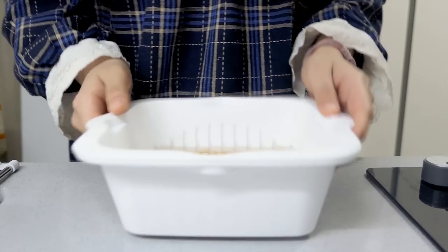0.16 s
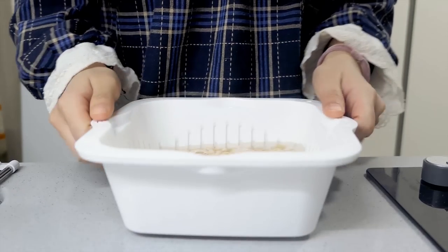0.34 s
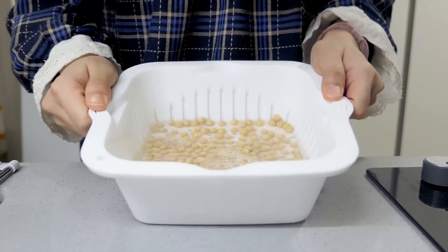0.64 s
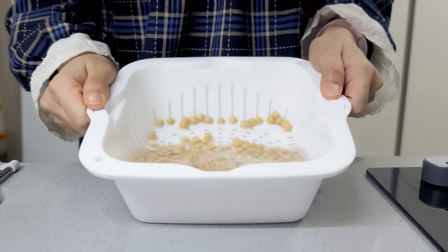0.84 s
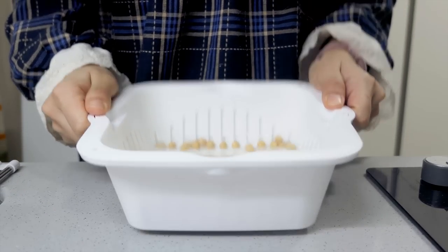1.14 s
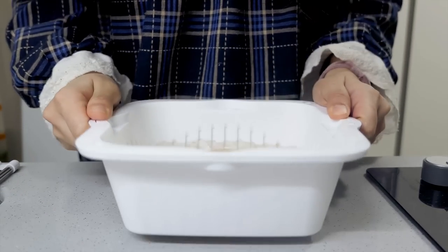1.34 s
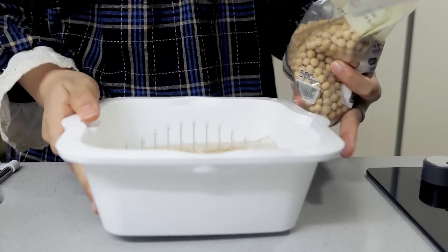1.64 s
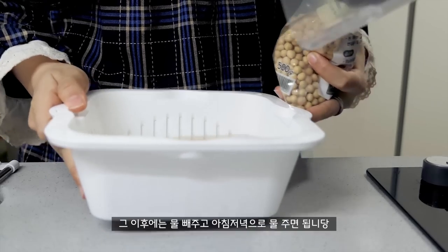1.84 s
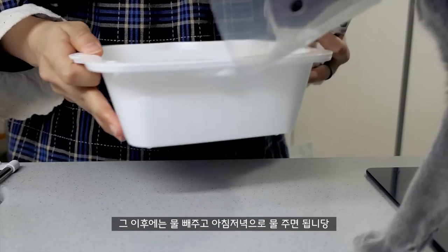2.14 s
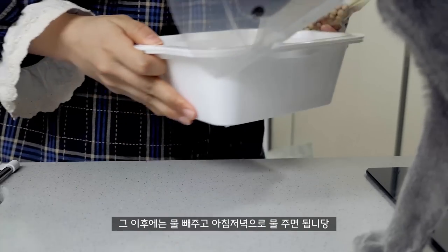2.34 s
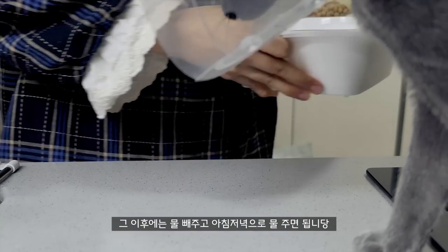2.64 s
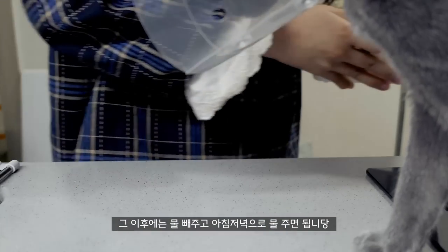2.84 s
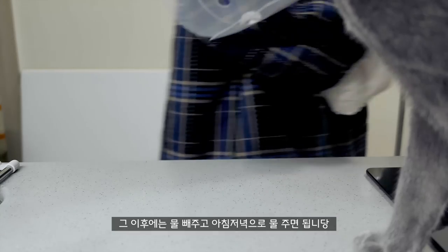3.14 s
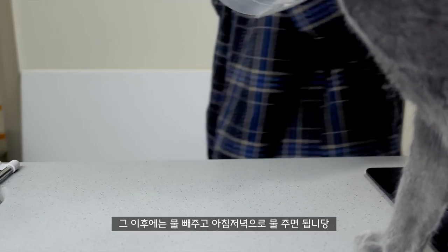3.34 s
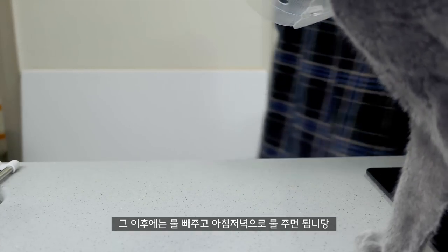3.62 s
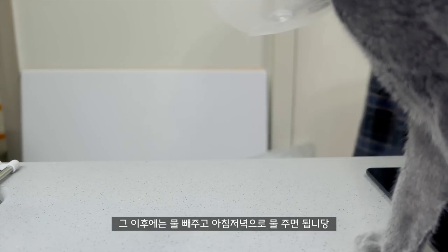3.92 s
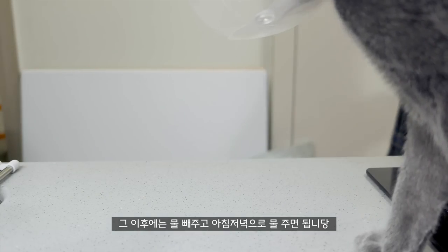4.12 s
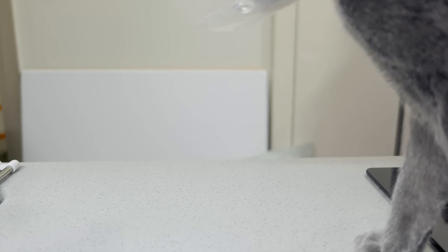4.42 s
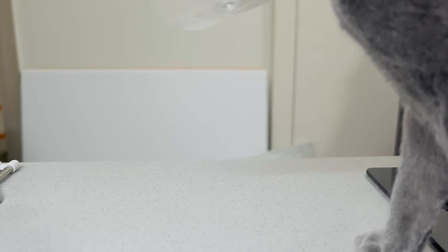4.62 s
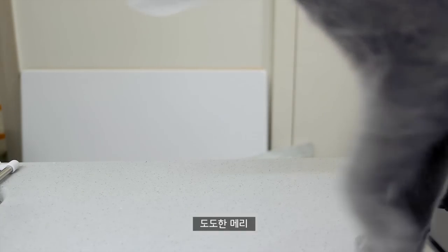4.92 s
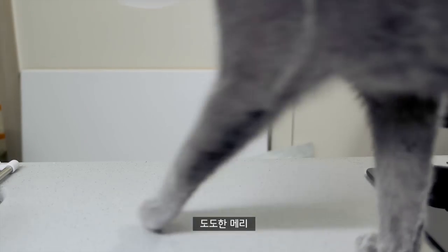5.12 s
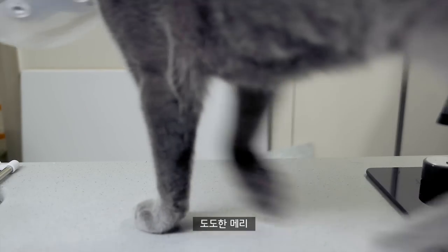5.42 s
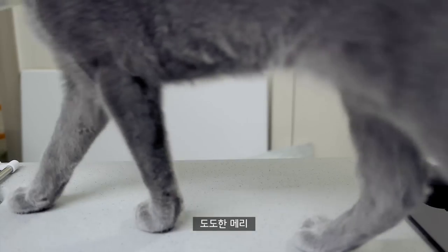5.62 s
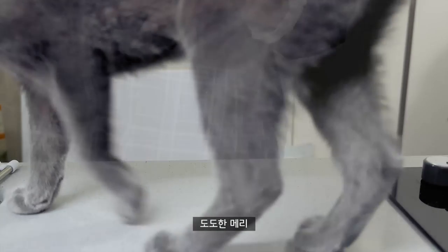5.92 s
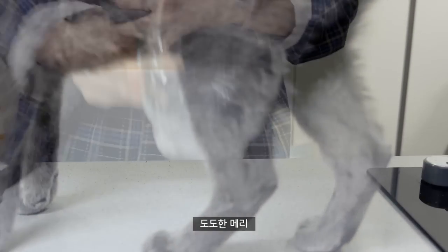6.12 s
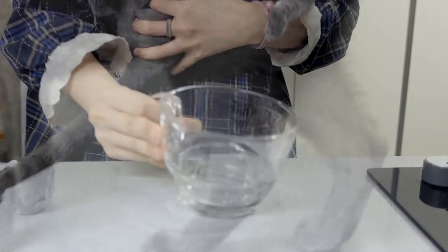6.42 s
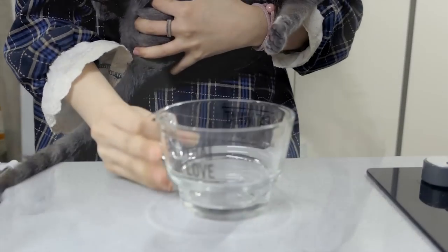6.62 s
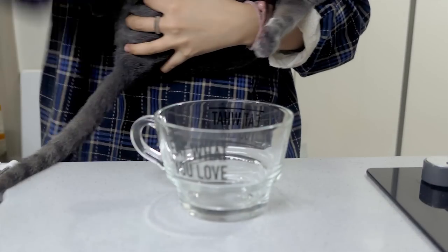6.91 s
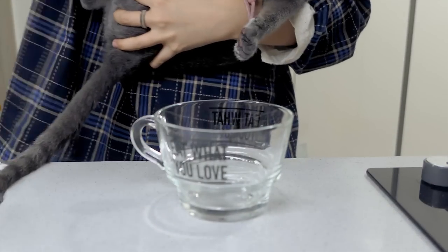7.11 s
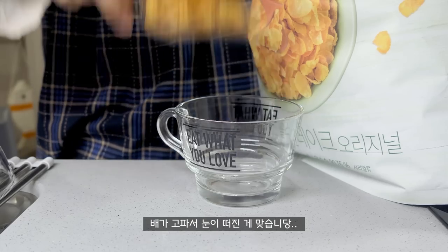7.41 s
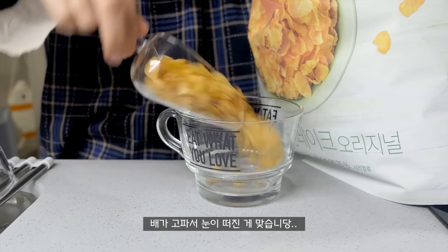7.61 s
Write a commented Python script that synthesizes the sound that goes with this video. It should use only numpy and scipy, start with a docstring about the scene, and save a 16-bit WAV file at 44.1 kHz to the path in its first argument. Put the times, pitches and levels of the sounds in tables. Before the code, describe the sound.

Plastic tub of soaked beans knocks and rattles on a counter, slippers scuff away, soft fur brushes past, then a glass cup cracks down and dry flakes pour in.

```python
"""Kitchen counter in a small hard room, heard on a two-channel microphone over a quiet hum.
A plastic tub of soaked beans is knocked and set down: noise through wall resonances, booms, scattered taps.
Slippers scuff as gritty clicks and heel thuds, over a low rumble; cloth and fur swish as grainy noise.
A glass cup and a bag are put down and a scoop clinks: noise cracks, counter tones, clean glass modes.
Dry flakes pour into the cup as dense bright ticks."""
import sys
import numpy as np
from scipy import signal
from scipy.fft import rfft, irfft
from scipy.io import wavfile

SR = 44100
rng = np.random.default_rng(int(sys.argv[2]) if len(sys.argv) > 2 else 0)


def put_to_file(sound):
    """Save the sound as 16-bit audio at rate SR, in the file named by the first command-line argument."""
    columns = np.atleast_2d(sound).T  # one column per channel
    safe = np.clip(columns, -1, 1)
    whole_steps = np.round(safe * 32767)
    wavfile.write(sys.argv[1], SR, whole_steps.astype(np.int16))


N = 342216
TIME = np.arange(N) / SR


def undb(db):
    """Amplitude factor of a level in dB."""
    return 10 ** (np.asarray(db) / 20)


def unit(x):
    """Scales to an RMS of 1."""
    return x / np.sqrt(np.mean(x ** 2))


def band(x, hz, width):
    """Two-pole resonance, gain 1 at the centre."""
    return signal.lfilter(*signal.iirpeak(min(hz, .45 * SR), hz / width, fs=SR), x)


def edge(x, hz, kind):
    """Second-order high- or low-pass."""
    return signal.sosfilt(signal.butter(2, hz, kind, fs=SR, output="sos"), x)


def curve(table):
    """Columns of a table over time; the level is -120 dB outside it."""
    s, db, *rest = np.transpose(table)
    level_db = np.interp(TIME, s, db, left=-120, right=-120)
    return [level_db] + [np.interp(TIME, s, column) for column in rest]


def fade(t, t60):
    """Exponential decay by 60 dB in t60 seconds, never shorter than 5 ms."""
    return np.exp(-np.log(1000) * t / max(t60, .005))


def onset(t, rise):
    """Exponential approach to full strength."""
    return 1 - np.exp(-t / max(rise, .0001))


def add(out, s, sound, pan_db):
    """Mixes a sound in at its time; positive pan is louder on the left."""
    i = int(s * SR)
    out[:, i:i + sound.shape[-1]] += sound[..., :N - i] * undb(np.array([[pan_db], [-pan_db]]) / 2)


def grains(rate, spread_db, size=N):
    """Random clicks of uneven size, rate per second."""
    big_db = spread_db * np.minimum(rng.exponential(size=size), 3.0)
    hits = rng.random(size) < rate / SR
    return unit(hits * rng.standard_normal(size) * undb(big_db))


def thump(hz, size):
    """Dull noise around one pitch; the reversal puts it at full strength from the first moment."""
    return unit(band(band(rng.standard_normal(size), hz, 0.26 * hz), hz, 5.0 * hz))[::-1]


SLAB_SIDE = 0.6  # share of the beating tones that differs left and right
CLEAN_BELOW_HZ = 1400  # higher modes crowd together and blur


def drone(modes, t, width, clean):
    """A damped slab: each mode is a clear tone among close ones that beat as they die, spread left and right."""
    mix = np.array([[1, SLAB_SIDE], [1, -SLAB_SIDE]])
    total = 0
    for hz, db, t60 in modes:
        noise = rng.standard_normal((2, len(t)))
        beating = mix @ unit(band(noise, hz, width)[:, ::-1])
        clean_gain = clean / (1 + (hz / CLEAN_BELOW_HZ) ** 4)
        polarity = np.sign(noise[0, 0])
        tone = clean_gain * polarity * np.sin(2 * np.pi * hz * t)
        total = total + undb(db) * fade(t, t60) * (beating + tone)
    return total


# colour of the room and appliance noise: (frequency [Hz], relative level [dB])
HUSH_COLOUR = [(18, -45), (30, 0), (60, -31), (108, 4.5), (152, -7), (270, 6), (324, 6.5), (350, 0.5),
               (747, -5), (970, -5), (1970, -12.5), (2180, -14), (2360, -14), (4190, -17), (15500, -22)]
# treble of the hush, above about 1.8 kHz: (time [s], level change [dB])
HUSH_TREBLE_CHANGE = [(0, -15), (6.3, -4), (6.42, -39), (6.65, -20), (6.8, -19.5), (7.1, -5), (7.76, 11)]
HUSH_DB = -40.5  # RMS level before the treble change


def hush():
    """Room and appliance noise, unrelated left and right; its treble level shifts over time."""
    hz = np.fft.rfftfreq(N, 1 / SR) + 1
    colour_hz, colour_db = np.transpose(HUSH_COLOUR)
    colour = undb(np.interp(np.log(hz), np.log(colour_hz), colour_db))
    mid, side = irfft(rfft(rng.standard_normal((2, N))) * colour, N)
    both = unit(np.array([mid + side, mid - side])) * undb(HUSH_DB)
    treble_gain = undb(curve(HUSH_TREBLE_CHANGE)[0])
    return both + (treble_gain - 1) * edge(both, 1800, "high")


# echo of the small hard room, by band: (centre [Hz], t60 [s], relative level [dB])
ROOM_BANDS = [(155, 0.55, 4.5), (450, 0.12, 16), (880, 0.36, 0.5), (2610, 0.21, 8.5), (5130, 0.025, -34),
              (10300, 0.17, 4)]
ROOM_DB, ROOM_SIDE = -12, 0.37  # echo level; share that differs left and right


def room(x):
    """Diffuse echoes: noise bands that each die at their own rate."""
    t = TIME[:SR // 2]
    mid, side = sum(undb(db) * band(rng.standard_normal((2, len(t))), hz, hz) * fade(t, t60)
                    for hz, t60, db in ROOM_BANDS)
    soft_start = np.minimum(t / 0.0026, 1)
    tail = np.array([mid + ROOM_SIDE * side, mid - ROOM_SIDE * side]) * soft_start
    return signal.fftconvolve(x[None], tail / np.sqrt(np.sum(tail ** 2) / 2), axes=1)[:, :N]


def scatter(x):
    """Nearby surfaces reach the two microphone channels differently, mostly in the treble."""
    t = TIME[:SR // 50]
    echoes = unit(rng.standard_normal(len(t)) * fade(t, 0.0044)) / np.sqrt(len(t))
    side = signal.fftconvolve(edge(x, 1260, "high"), echoes)[:N]
    return undb(-13.0) * np.array([side, -side])


# footfalls and paws shaking floor and counter: (time [s], level [dB], deep part re level [dB])
FLOOR_SHAKES = [(4.499, -38, -4), (4.589, -32.5, -7), (4.878, -48, 2), (5.008, -53, -6), (5.149, -40, -9),
                (5.719, -56, -18), (5.789, -41.5, -20), (6.331, -47, -20), (7.091, -31, -29),
                (7.201, -33, -29), (7.286, -40, -15), (7.389, -52, -15)]
RUMBLE_RISE_S, RUMBLE_T60_S = 0.0075, 0.45


def rumble():
    """Low noise around two pitches, from floor and counter shaken by each step."""
    out, t = np.zeros((2, N)), TIME[:2 * SR // 5]
    envelope = onset(t, RUMBLE_RISE_S) * fade(t, RUMBLE_T60_S)
    for s, db, deep_db in FLOOR_SHAKES:
        shake = thump(128, len(t)) + undb(deep_db) * thump(75, len(t))
        add(out, s, undb(db) * envelope * shake, 0)
    return out


# cloth and fur brushing past: (time [s], swell [s], hold [s], fade [s], level [dB],
# low part re level [dB], treble re level [dB])
BRUSHES = [(4.38, 0.23, 0.062, 0.25, -34.5, 2, -3), (4.79, 0.078, 0.32, 0.39, -47.5, -2.5, -82),
           (5.248, 0.12, 0.015, 0.078, -36, -4, -9), (5.421, 0.15, 0.13, 0.28, -27, 0, 4),
           (6.006, 0.088, 0.19, 0.13, -35, -5.5, -5), (6.347, 0.019, 0.0058, 0.0035, -33.5, -12, -7),
           (7.084, 0.0037, 0.017, 0.26, -34.5, -2, -3), (7.21, 0.0044, 0.048, .03, -43, 4, 10),
           (7.281, 0.0031, 0.0081, 0.092, -20.5, -8, 9), (7.361, 0.028, 0.0079, 0.082, -31, -10, -6)]
SWISH_DEPTH_DB = 30.5  # a brush swells from and fades to this far under its level


def swell(s, rise, hold, fall, depth_db):
    """Gain that climbs, holds and sinks straight in dB, with -120 dB outside."""
    corners = np.cumsum([s, rise, hold, fall])
    return undb(np.interp(TIME, corners, [-depth_db, 0, 0, -depth_db], left=-120, right=-120))


def swish():
    """Soft rubbing: slightly grainy middle and treble over smooth low noise."""
    rub = grains(6000, 0.74)
    low = unit(band(band(rng.standard_normal(N), 306, 90), 990, 1160))
    middle = unit(band(rub, 2000, 1500))
    treble = unit(band(rub, 8240, 8500))
    out = 0
    for s, rise, hold, fall, db, low_db, treble_db in BRUSHES:
        cloth = middle + undb(low_db) * low + undb(treble_db) * treble
        out = out + undb(db) * swell(s, rise, hold, fall, SWISH_DEPTH_DB) * cloth
    return out


# slipper scuffs: (time [s], level [dB], centre [Hz], bite re scuff [dB], heel [Hz],
# heel thud re scuff [dB], treble re scuff [dB], t60 [s])
SLIPPER_SCUFFS = [(3.109, -45, 3340, -16, 304, -8, 12, 0.25), (3.218, -56, 874, -10, 301, 2, 17, 0.39),
                  (3.401, -32.5, 1100, -6.5, 262, -2.5, 0.5, 0.26),
                  (3.511, -28.5, 1780, 1, 298, -5, 4, 0.41), (3.549, -24, 2060, -4, 586, -5, 6, 0.17),
                  (3.712, -9, 1200, -2, 513, -9, -21, 0.037), (3.723, -19, 2060, -8.5, 510, -15, -7, 0.18),
                  (3.793, -30, 1110, -0.5, 465, 1.5, 1, 0.35),
                  (3.828, -22, 1350, 0.5, 520, -21, -0.5, 0.27),
                  (3.911, -22.5, 1530, 5.5, 584, -13, 2, 0.19),
                  (3.988, -31.5, 1450, 4, 555, -3.5, 6.5, 0.34),
                  (4.109, -30.5, 1760, 5, 476, -4.5, 12, 0.26), (4.19, -30, 1170, -3, 353, -10, -3, 0.18),
                  (4.219, -28.5, 2290, 7, 361, -17, 18.5, 0.21),
                  (4.275, -22, 1180, 1.5, 303, -3.5, 7.5, 0.2), (4.347, -28.5, 1610, 7, 460, 0, 10.5, 0.17),
                  (4.383, -30, 2330, 5, 290, -3, 2, 0.27), (4.481, -23, 1610, -6, 330, -3, -4, 0.22),
                  (4.58, -33, 1600, -12, 286, 5, -28, 0.14), (4.659, -30, 2000, 3, 368, -22, -28, 0.43),
                  (4.698, -32, 2340, 2, 287, -24, -31, 0.17), (4.846, -30.5, 1406, -3, 280, 2, -2.5, 0.19),
                  (4.871, -50, 1700, -2, 286, -5, -7, 0.16), (5.184, -29, 1710, -29, 262, 7, -9, 0.11),
                  (5.277, -32, 2000, 1, 271, 2, 4.5, 0.14), (5.372, -41, 1680, -1, 535, 1, 3, 0.46),
                  (5.425, -34, 1890, -19, 550, 5.5, 2, 0.28), (5.495, -36, 2000, 7.5, 410, 2, -6, 0.23),
                  (5.977, -25, 2630, -2, 316, -1.5, 4, 0.098), (6.087, -29, 2600, 5, 298, -18, 11.5, 0.076)]
SCUFF_RISE_S, SCUFF_BITE_HZ = 0.0074, 2590
SCUFF_TREBLE_T60_S = 3.3  # further decay of the treble, on top of the scuff's own
SCUFF_SLAP, SCUFF_SLAP_T60_S = 0.89, 0.02  # extra strength of the first contact


def slippers():
    """A sole scrapes grittily for a moment and the heel thuds."""
    out, t = np.zeros((2, N)), TIME[:2 * SR // 5]
    slap = 1 + SCUFF_SLAP * fade(t, SCUFF_SLAP_T60_S)
    for s, db, hz, bite_db, heel_hz, thud_db, treble_db, t60 in SLIPPER_SCUFFS:
        grit = grains(6000, 0.46, size=len(t))
        scrape = unit(band(band(grit, hz, 0.48 * hz), hz, 1.94 * hz))
        bite = undb(bite_db) * unit(band(grit[::-1], SCUFF_BITE_HZ, 1700))
        treble = undb(treble_db) * unit(band(grit, 10100, 6300)) * fade(t, SCUFF_TREBLE_T60_S)
        heel = undb(thud_db) * thump(heel_hz, len(t))
        envelope = onset(t, SCUFF_RISE_S) * fade(t, t60) * slap
        add(out, s, undb(db) * envelope * (scrape + bite + treble + heel), 0)
    return out


# dry flakes, a trickle off the scoop and then the pour: (time [s], level [dB], middle re level [dB])
FLAKE_FLOW = [(7.42, -59, -4), (7.48, -44, 8.5), (7.53, -37, 5.5), (7.57, -30, 0.5), (7.6, -49, 1),
              (7.655, -38, -11), (7.67, -32, -12), (7.692, -38, -13), (7.7, -30, 2.5), (7.72, -23.5, -5),
              (7.76, -23, -6)]


def flakes():
    """Dense brittle ticks."""
    flow_db, middle_db = curve(FLAKE_FLOW)
    ticks = grains(14000, 1.1)
    treble = edge(edge(ticks, 5800, "high"), 9800, "low")
    return undb(flow_db) * (unit(treble) + undb(middle_db) * unit(band(ticks, 1900, 4800)))


# blows on counter and cup: (time [s], crack [dB], centre [Hz], thud [Hz], thud re crack [dB],
# treble re crack [dB], counter ring re crack [dB])
COUNTER_BLOWS = [(6.38, 2, 1470, 530, -12.5, -8.5, -22), (6.624, -21, 1170, 540, 2.5, -37, -9),
                 (6.628, -19, 1030, 540, -4.5, -39, -16), (6.686, -11, 1030, 440, -22, -33, -11.5),
                 (6.692, 1, 1420, 535, -14, -32, -34), (6.702, -18, 1010, 593, -3, -30, -21),
                 (6.711, -14.5, 1610, 604, -22, -28, -26), (6.716, -9.5, 1670, 450, -7, -30, -17.5),
                 (7.089, -31.5, 1550, 225, -17, 2, -9), (7.097, -24, 1300, 225, -6, -25, -18),
                 (7.207, -26, 1240, 300, -3, 1.5, -23), (7.274, -22, 2070, 400, -16, -30, -42),
                 (7.285, -4, 2100, 407, -38, -3, -57), (7.389, -22, 860, 306, -6.5, -29, -17),
                 (7.572, 0.5, 1400, 470, -21, 2.5, -31), (7.581, -30, 1450, 466, -36, -37, -50),
                 (7.708, -27, 1530, 280, -1.5, -16, -27)]
# distinct modes of the counter: (frequency [Hz], relative level [dB], t60 [s])
COUNTER_MODES = [(263.5, -10, 0.25), (351.4, -12, 0.43), (606, -9, .33), (780, -18, .9), (1062, -9, 0.4),
                 (1372, -2, 0.1), (1626, -8, 0.25), (2075, -12, 0.2), (538, -12, 0.75), (910, -12, .65),
                 (1110, -14, 0.65), (1206, -12, .8)]
# crowded small modes, too close to tell apart: (centre [Hz], width [Hz], relative level [dB], t60 [s])
COUNTER_CROWD = [(650, 440, -6.5, 0.68), (1580, 430, -4, 0.47), (2120, 260, -15, 0.26),
                 (3900, 1900, -25, 0.067)]
CRACK_T60_S = 0.034
JOLT_HZ, JOLT_T60_S, JOLT_DB = 135, 0.061, -24.5  # jolt level re crack


def cup():
    """Sharp cracks that jolt the counter and set it ringing."""
    out, t = np.zeros((2, N)), TIME[:3 * SR // 5]
    jolt = undb(JOLT_DB) * np.sin(2 * np.pi * JOLT_HZ * t) * fade(t, JOLT_T60_S)
    for s, db, hz, thud_hz, thud_db, treble_db, counter_db in COUNTER_BLOWS:
        noise = rng.standard_normal((2, len(t)))
        snap = 0.89 * unit(band(noise[0], hz, 0.28 * hz))[::-1] * fade(t, CRACK_T60_S)
        hiss_fade = fade(t, 0.72 * CRACK_T60_S) + 2.0 * fade(t, 0.005)  # hard first contact
        treble = undb(treble_db) * unit(edge(noise[1], 3600, "high")) * hiss_fade
        thud = undb(thud_db) * thump(thud_hz, len(t)) * fade(t, 0.086)
        wash = sum(undb(wash_db) * fade(t, t60) * unit(band(band(noise[1], mode_hz, w), mode_hz, 2 * w))
                   for mode_hz, w, wash_db, t60 in COUNTER_CROWD)
        slab = undb(counter_db) * (drone(COUNTER_MODES, t, 19, 2.18) + wash)
        add(out, s, undb(db) * (snap + treble + thud + jolt + slab), 0)
    return out


# modes of the glass cup: (frequency [Hz], level struck at the base [dB], struck at the rim [dB], t60 [s])
CUP_MODES = [(1545, -16, -1, .42), (1709, 1, -7, .32), (3098, -14.5, -12, .7), (3332, -26, -30, .6),
             (4651, -36, -28, .7), (5103, -32, -11.5, .3), (6121, -32, -28, .45), (7510, -26, -36, .3),
             (8608, -40, -32, .5), (8995, -38, -30, .8), (9588, -40, -32, .8)]


def ring(t, base_db, rim_db):
    """Clean glass modes; base and rim blows wake different ones."""
    return sum((undb(base + base_db) + undb(rim + rim_db)) * fade(t, t60) * np.sin(2 * np.pi * hz * t)
               for hz, base, rim, t60 in CUP_MODES)


# blows that leave the glass free to ring: (time [s], base ring [dB], rim ring [dB])
GLASS_RINGS = [(6.693, -19, -60), (6.714, -22, -60), (7.574, -60, -13)]


def glass():
    """Clean decaying glass tones of the cup."""
    out = np.zeros((2, N))
    for s, base_db, rim_db in GLASS_RINGS:
        add(out, s, ring(TIME[:3 * SR // 5], base_db, rim_db), 0)
    return out


# wall resonances of the tub, four lower then three upper: (centre [Hz], width [Hz], relative level [dB])
WALL_RESONANCES = [(950, 290, 9), (1325, 340, 18.5), (1625, 133, 19.5), (1950, 680, 13.5), (5280, 1800, 3),
                   (2475, 200, 18), (2730, 300, 17.5)]


def walls(x):
    """The hollow colour of the tub."""
    resonances = sum(undb(db) * band(x, hz, w) for hz, w, db in WALL_RESONANCES)
    return unit(resonances + 0.027 * band(x, 2100, 9000))


def crack(t, t60, treble_db):
    """The walls of the tub struck once; the treble dies first."""
    noise = rng.standard_normal((2, len(t)))
    treble = undb(treble_db) * unit(band(noise[1], 12300, 15000)) * fade(t, 0.53 * t60)
    return walls(noise[0]) * fade(t, t60) + treble


BEANS_PER_S, BEAN_SPREAD_DB = 350, 3.4  # taps a second on each wall resonance, their spread of size


def taps(resonances):
    """Bean taps, a separate stream on each wall resonance."""
    return unit(sum(undb(db) * unit(band(grains(BEANS_PER_S, BEAN_SPREAD_DB), hz, w)) * np.sqrt(w)
                    for hz, w, db in resonances))


# beans rolling and shifting: (time [s], level [dB], lower wall resonances re level [dB])
BEAN_SHIFTS = [(0.0, -38, 8), (0.09, -34, 2), (0.3, -40.5, 6.5), (0.5, -39.5, 5.5), (0.55, -38, 1),
               (0.65, -42, 2), (0.75, -39, 1), (0.87, -36, 0), (0.99, -39, 0), (1.03, -48, -4),
               (1.19, -39.5, 0.5), (1.24, -33.5, 3), (1.38, -36.5, 4.5), (1.45, -35.5, 4), (1.51, -33, -2),
               (1.545, -35, 6), (1.57, -29.5, 2), (1.63, -40, 3), (1.85, -48.5, 4), (2.04, -50, -19),
               (2.25, -46.5, 1), (2.56, -53.5, -9), (2.9, -70, -4), (2.94, -46, 1), (3.03, -54, -2),
               (3.35, -63, -3)]
RUSH_DB = 1.6  # depth of the rushes


def patter():
    """Each bean lands on its own spot and wakes one resonance of the walls; they come in small rushes."""
    level_db, low_db = curve(BEAN_SHIFTS)
    wander = np.clip(unit(edge(rng.standard_normal(N), 2.8, "low")), -2, 1.5)
    upper = taps(WALL_RESONANCES[4:])
    lower = undb(low_db) * taps(WALL_RESONANCES[:4])
    ticks = grains(2 * BEANS_PER_S, BEAN_SPREAD_DB)
    middle = undb(-4.5) * unit(band(ticks, 3200, 3500))
    treble = undb(-6.5) * unit(band(ticks, 8600, 2800))
    return undb(level_db + RUSH_DB * wander) * (upper + lower + middle + treble)


# single beans ticking on the wall: (time [s], relative level [dB], centre [Hz])
SINGLE_BEANS = [(0.315, -31, 2570), (0.3625, -21, 2580), (0.391, -22, 2270), (0.425, -32, 2510),
                (0.441, -20.5, 2700), (0.459, -20, 2700), (0.475, -23, 2620), (0.5847, -29, 2290),
                (0.6396, -30, 2600), (0.812, -17, 2630), (0.9782, -28, 2640), (1.1488, -18, 2600),
                (1.236, -14, 2600), (1.4109, -22, 2580), (1.4303, -19, 2600), (1.4443, -13.5, 2650),
                (1.5565, -28, 2600), (1.6373, -38, 2560), (1.669, -35, 2280), (1.6886, -24, 2570),
                (1.749, -23, 2450), (1.8038, -27, 2900), (1.945, -52, 2570), (1.9535, -41, 2600),
                (2.055, -9.5, 2500), (2.2154, -39, 2620), (2.379, -31, 1950), (2.4993, -34.5, 2500),
                (2.557, -42, 2220), (2.7062, -39, 2570), (2.8574, -30, 2660), (2.931, -34, 2340),
                (3.1462, -30.5, 2630)]
BEAN_TICK_T60_S, BEAN_TICK_WIDTH_HZ = 0.034, 170


def bean_ticks():
    """Each bean wakes a short narrow ring of noise."""
    out, t = np.zeros((2, N)), TIME[:SR // 10]
    for s, db, hz in SINGLE_BEANS:
        narrow = unit(band(rng.standard_normal(len(t)), hz, BEAN_TICK_WIDTH_HZ))[::-1]
        add(out, s, undb(db) * narrow * fade(t, BEAN_TICK_T60_S) / 2, 0)
    return out


# handfuls of beans thrown against the wall: (time [s], level [dB], treble re level [dB], t60 [s])
BEAN_HANDFULS = [(0.848, -27, -15, 0.062), (0.865, -21, 5, 0.041), (0.892, -22, 5, 0.036),
                 (0.91, -28, 1, 0.11), (1.046, -31, -31, 0.077), (1.114, -23, -27, 0.032),
                 (1.207, -26.5, -29, 0.27), (1.5109, -15, 3, 0.032), (1.516, -23, 0, 0.3),
                 (2.053, -28.5, 14, 0.22), (2.157, -34, 3, 0.44), (2.265, -35, -10, 0.19),
                 (2.423, -35, 1, 0.058)]
THROW_RISE_S, THROW_BODY_HZ, THROW_BODY_DB = 0.00033, 326, -30  # body re level


def bean_throws():
    """Beans strike the wall together: a crack over a faint dull body."""
    out, t = np.zeros((2, N)), TIME[:2 * SR // 5]
    for s, db, treble_db, t60 in BEAN_HANDFULS:
        body = undb(THROW_BODY_DB) * thump(THROW_BODY_HZ, len(t)) * fade(t, t60)
        add(out, s, undb(db) * onset(t, THROW_RISE_S) * (crack(t, t60, treble_db) + body), 0)
    return out


# tub knocked on the counter: (time [s], crack [dB], thud [Hz], thud re crack [dB], treble re crack [dB],
# hollow re crack [dB], crack t60 [s], ring re crack [dB])
KNOCKS = [(0.011, -14, 149.4, 2.5, -1, 9, 0.069, -16), (0.039, -9.5, 231, 6, -30, 3.5, 0.063, -20),
          (0.169, -24, 221, 10.5, -19, -9, 0.13, -10), (0.223, -7, 307, 2, -0.5, 1, 0.049, -29.5),
          (0.236, -14, 216, 7, 6, 4.5, 0.098, -14), (0.283, -30, 265, 9, -24, -10, 0.06, -24),
          (0.779, -24, 213, 1, 0, -29, 0.065, -22), (0.96, -31.5, 242, 8, -22, -16, 0.27, -17),
          (1.286, -9, 239, 3, 0, -18, 0.079, -21), (1.308, -20.5, 151.7, 4.5, -25, -14, 0.15, -13.5),
          (1.46, -16, 215, 1, -25, 4.5, 0.043, -25), (1.467, -19.5, 199, 5.5, -25, -5, 0.05, -30),
          (1.553, -21.5, 295, 5, 0.5, -25, 0.33, -35), (1.77, -33.5, 302, 7, 9, -24, 0.18, -17.5)]
# ringing modes of the tub: (frequency [Hz], relative level [dB], t60 [s])
TUB_MODES = [(133, 3, 0.22), (198, -10, 0.1), (265, 3, 0.25), (354, 0, 0.14), (538, -7, 0.65),
             (641, -12, 0.55)]
TUB_HOLLOW_HZ, KNOCK_PAN_DB = 1363, 1
KNOCK_RISE_S, BOOM_RISE_S = 0.0019, 0.0023
THUD_CYCLES, BOOM_BLUR = 13.3, 1  # a thud dies in so many cycles; noise re tone in a boom


def tub():
    """Knocks crack through the walls and boom in the bottom, slightly left."""
    out, t = np.zeros((2, N)), TIME[:2 * SR // 5]
    for s, db, hz, thud_db, treble_db, hollow_db, t60, ring_db in KNOCKS:
        hollow_noise = unit(band(rng.standard_normal(len(t)), TUB_HOLLOW_HZ, 140))
        hollow = undb(hollow_db) * hollow_noise * fade(t, t60)
        blurred_tone = np.sin(2 * np.pi * hz * t) + BOOM_BLUR * thump(hz, len(t))
        boom = undb(thud_db) * blurred_tone * fade(t, THUD_CYCLES / hz)
        boom = boom + undb(ring_db) * drone(TUB_MODES, t, 16, 2.26)
        shell = onset(t, KNOCK_RISE_S) * (crack(t, t60, treble_db) + hollow)
        add(out, s, undb(db) * (shell + onset(t, BOOM_RISE_S) * boom), KNOCK_PAN_DB)
    return out


def soften(x):
    """Softens everything above about 5 kHz."""
    return edge(x, 4950, "low")


def scene():
    """Direct sources with their echoes, over the hush; the glass tones are mixed in without added echo."""
    beans = patter() + bean_ticks() + bean_throws()
    softened = soften(rumble() + swish() + slippers() + cup() + beans + tub())
    direct = softened + flakes()  # the flakes keep their treble
    mid = direct.mean(axis=0)
    return hush() + undb(ROOM_DB) * room(mid) + scatter(mid) + direct + soften(glass())


def record(dry):
    """The microphone loses the deep bass, the loudest peaks clip, the top is cut at 15.9 kHz."""
    clipped = np.clip(edge(dry, 56, "high"), -1, 1)
    return signal.sosfilt(signal.ellip(10, .2, 70, 15900, fs=SR, output="sos"), clipped)


dry = scene()
out = record(dry)
put_to_file(out)
```